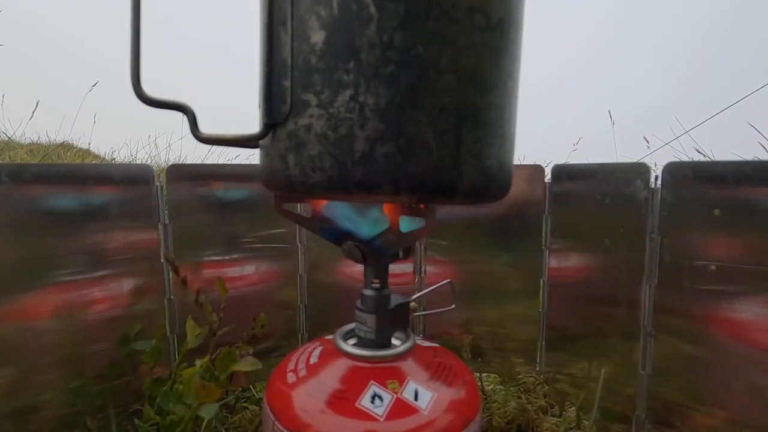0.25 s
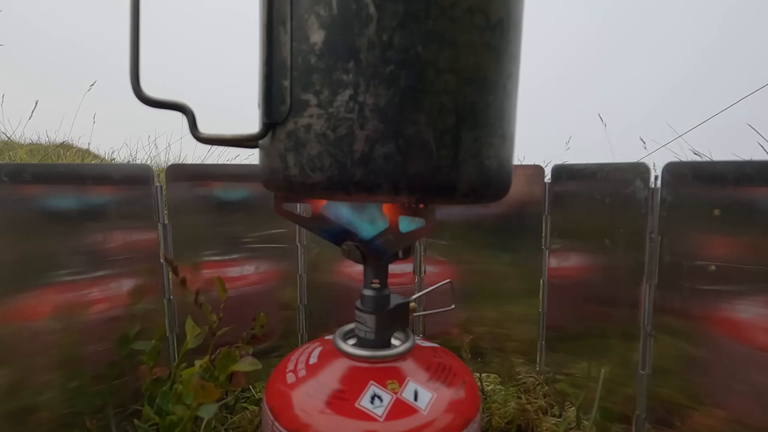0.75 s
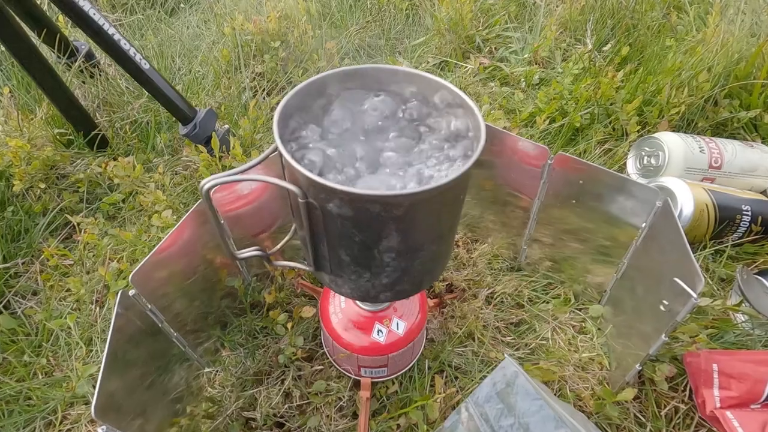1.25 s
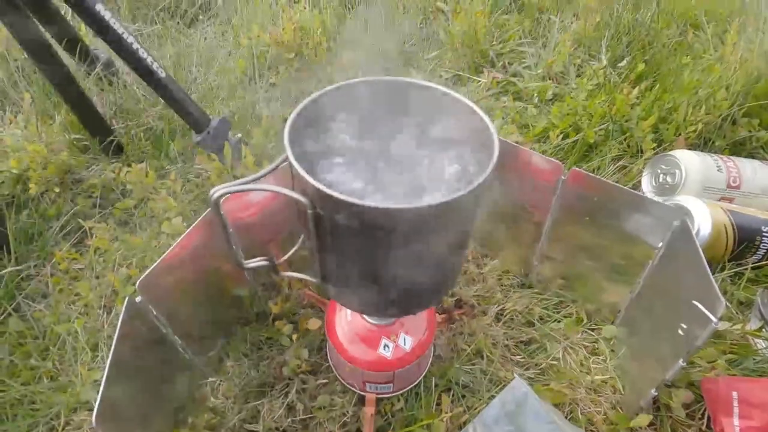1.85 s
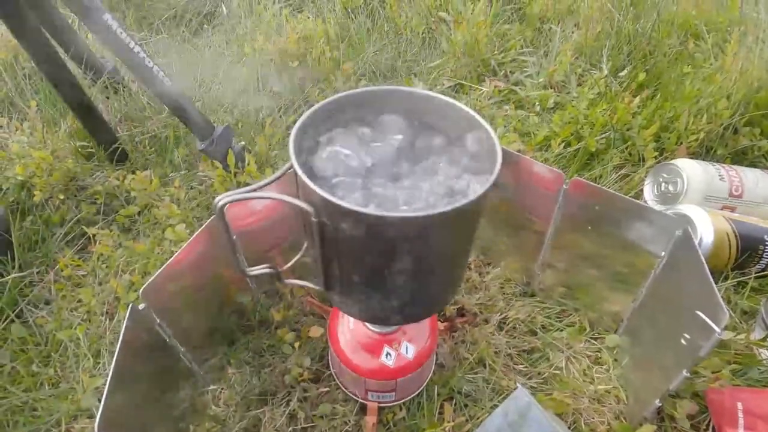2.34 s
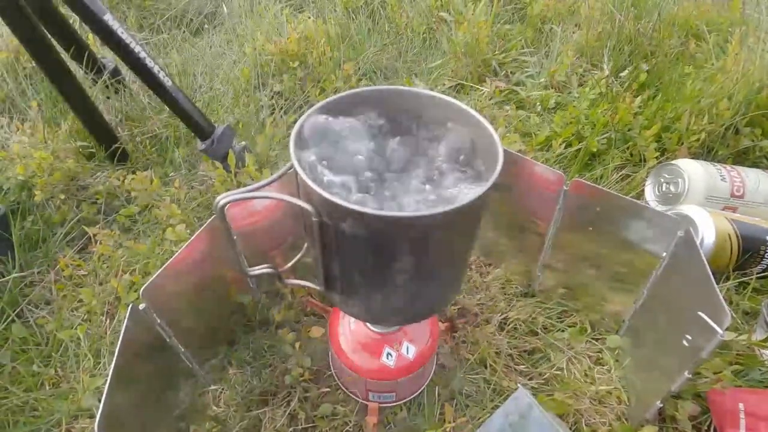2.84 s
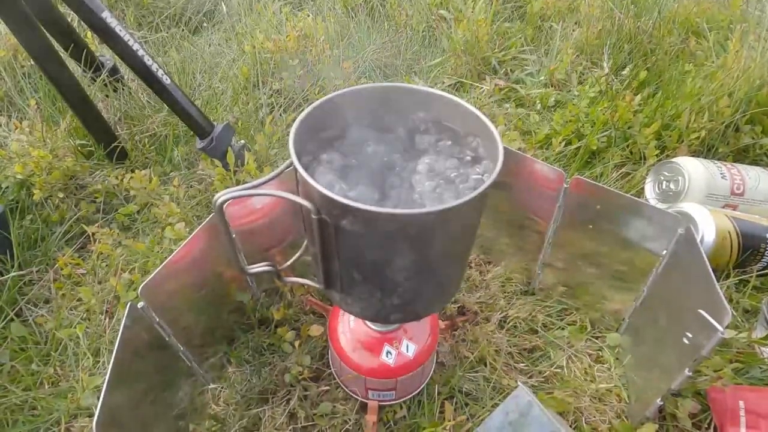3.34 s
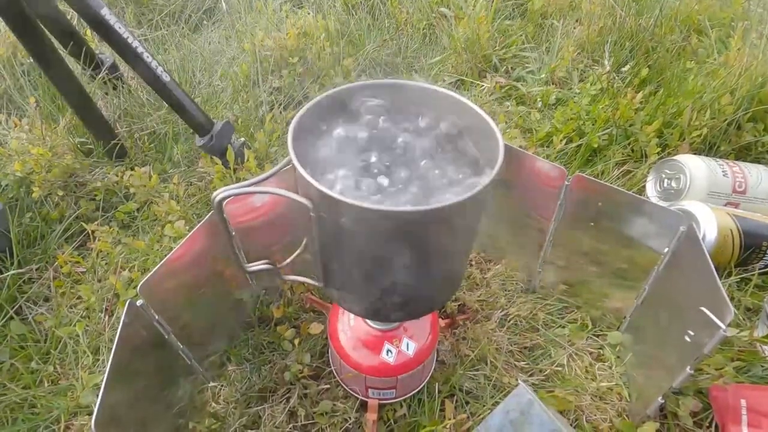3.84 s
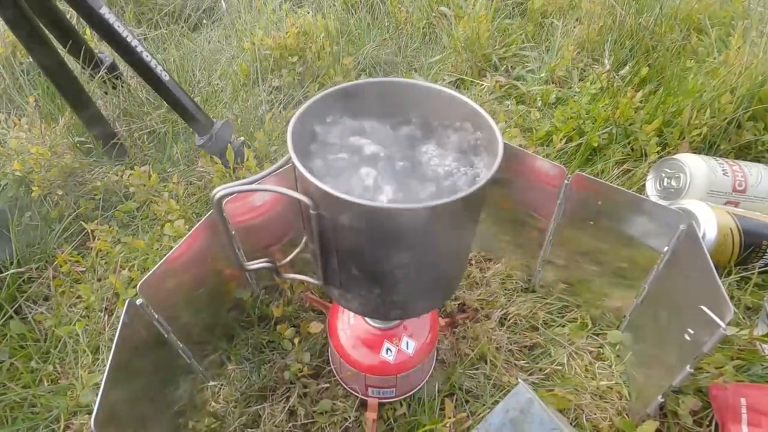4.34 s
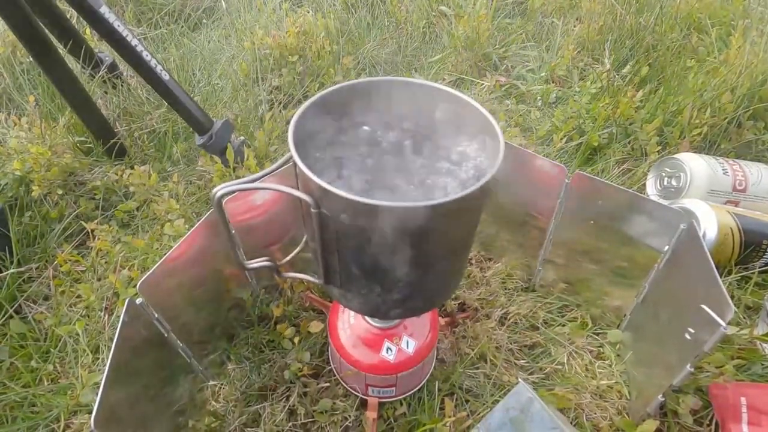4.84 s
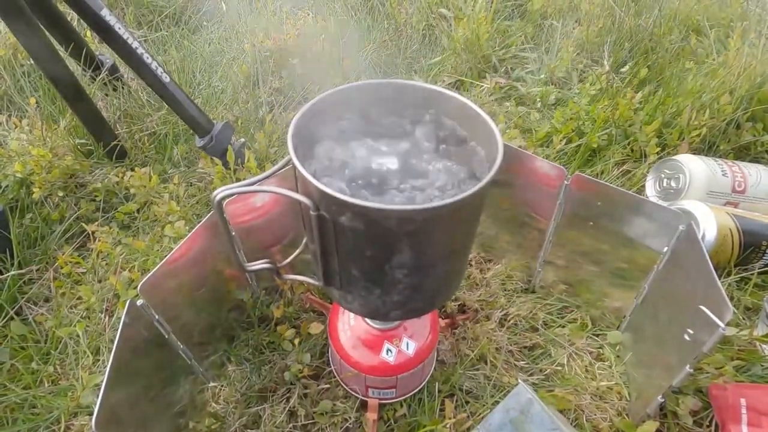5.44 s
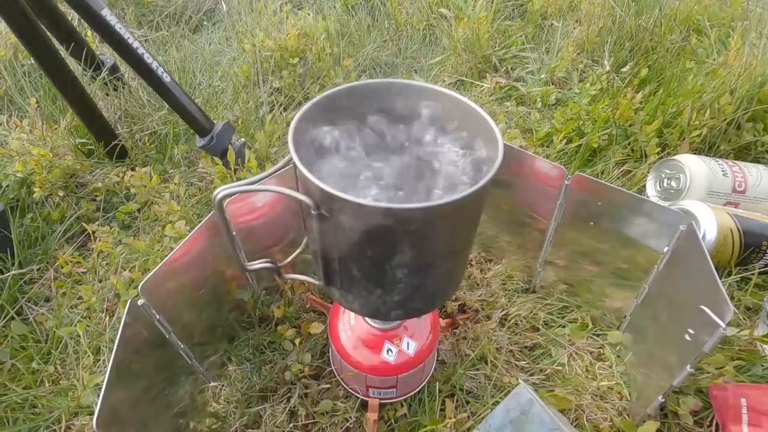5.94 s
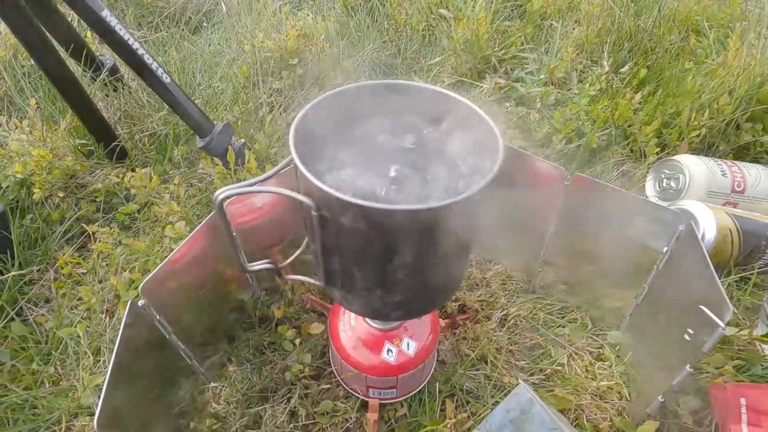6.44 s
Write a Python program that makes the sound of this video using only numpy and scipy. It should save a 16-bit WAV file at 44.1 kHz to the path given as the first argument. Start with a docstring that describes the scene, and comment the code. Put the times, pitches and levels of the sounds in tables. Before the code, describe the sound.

Right beside a small gas stove outdoors, a loud steady roar with low rumble and bright jet hiss. It cuts off abruptly to a short silence. From above the boiling mug the burner then fades in slowly, softer and duller; gusts twice tear the flame away, leaving airy hiss and tiny whistles before it catches again. Faint bubble clicks, low wind, and one sharp pop near the end.

```python
"""In the open, inside a folded metal wind shield, a small gas stove burns under a mug of water.
It is first heard close beside the burner; after a cut and a short silence it fades in from above the boiling mug.
Igniting gas eddies make the rumble, roar and hiss, and turbulent noise makes the jet and the treble above it.
Gusts tear the flame off the burner: its roar drops out and the bare gas jet whistles until it relights.
Bubbles burst as damped clicks, and wind buffets low at both places."""
import sys
import numpy as np
from scipy import signal
from scipy.fft import rfft, irfft, next_fast_len
from scipy.io import wavfile

SR = 44100
rng = np.random.default_rng(int(sys.argv[2]) if len(sys.argv) > 2 else 0)


def undo_db(level):
    """Turn decibels back into plain size, where 20 dB means ten times bigger."""
    steps = np.asarray(level, float) / 20
    return 10 ** steps


def waveform_to_disk(signal):
    """Save audio, clipped to [-1, 1], as 16-bit WAV at the path in sys.argv[1]."""
    frames = np.transpose(np.atleast_2d(signal))
    scaled = np.clip(frames, -1, 1) * 32767
    samples = np.round(scaled).astype(np.int16)
    wavfile.write(sys.argv[1], SR, samples)


N = 294588
T = np.arange(N) / SR
SIZE = next_fast_len(N)
HZ = np.maximum(np.arange(SIZE // 2 + 1) * SR / SIZE, 1.0)
LATE = np.clip((T - 4.85) / 0.15, 0, 1)  # 0 to 1 during the last gust: share of the late spectra

# steady layers beside the burner: rumble, roar, hiss, jet, top [level/dB]
BESIDE_LEVELS = [-22.5, -24.5, -31.7, -28, -50]
# spectra of these layers [f/Hz, level/dB per Hz]
RUMBLE_BESIDE_COLOUR = [(41, -43.5), (70, -8.5), (189, -2), (340, -8.5), (440, -41), (750, -120)]
ROAR_BESIDE_COLOUR = [(200, -24), (340, -0.5), (580, -5.5), (781, -7), (996, -2.5), (1210, -9), (1500, -24),
                      (1950, -50), (3300, -120)]
HISS_BESIDE_COLOUR = [(880, -29), (1500, -4.5), (1550, -20.5), (1670, -4.5), (1870, -0.5), (2290, -2.5),
                      (2870, -9.5), (4070, -9.5), (4420, -7), (5240, -14), (5600, -8.5), (7280, -40.5),
                      (12300, -120)]
JET_BESIDE_COLOUR = [(3290, -34), (5600, -11.5), (6110, -2.5), (6440, -1), (7280, -2.5), (7900, -0.5),
                     (8110, -1), (8710, -14.5), (9060, -6.5), (9430, -5.5), (9600, -19.5), (9860, -20),
                     (10500, -15), (13600, -46), (22000, -120)]
TOP_BESIDE_COLOUR = [(6180, -30), (10500, -8.5), (10900, -4.5), (11800, 0.5), (13900, -9), (15100, -12.5),
                     (15500, -24)]
# stereo balance beside the burner [f/Hz, left against right level/dB]
BESIDE_LEAN = [(60, 0), (110, -1), (200, 1), (380, -1.5), (700, -2), (1290, 1.5), (2380, -1), (4400, 1.5),
               (8120, 1.5), (15000, 5.5)]


def beside_burner():
    """Steady combustion noise: every layer keeps its mean level and spectrum."""
    colours = (RUMBLE_BESIDE_COLOUR, ROAR_BESIDE_COLOUR, [HISS_BESIDE_COLOUR],
               [JET_BESIDE_COLOUR], TOP_BESIDE_COLOUR)
    return stove(BESIDE_LEVELS, colours, BESIDE_LEAN, (0, 0, 0, 0), flutter_db=1.1)


# spectra above the mug [f/Hz, level/dB per Hz]
RUMBLE_ABOVE_COLOUR = [(41, -43.5), (70, -12.5), (108, -4.5), (172, 3.5), (236, 1), (300, -1.5), (340, -8),
                       (440, -59), (750, -120)]
ROAR_ABOVE_COLOUR = [(200, -17), (340, -4), (383, -5), (629, -1), (1010, -1), (1150, -5.5), (1450, -20),
                     (1500, -36), (1950, -57), (3300, -120)]
HISS_ABOVE_COLOUR = [(880, -38), (1500, -6.5), (1690, 4), (1930, -4.5), (2190, -4.5), (2380, -8),
                     (2560, -6), (2940, -9), (3660, -1), (4800, -10.5), (5600, -10), (7280, -43),
                     (12300, -120)]
JET_ABOVE_COLOUR = [(3290, -40), (5600, -4.5), (5790, -9), (6080, 0), (6390, 3), (7840, -12.5), (9010, -6),
                    (10500, -21.5), (13600, -51), (22000, -120)]
TOP_ABOVE_COLOUR = [(6180, -33.5), (10500, -1.5), (10900, -3.5), (13100, -3), (14600, -15.5), (14900, -16),
                    (15500, -28)]
# hiss and jet late above the mug, crossfaded in during the last gust [f/Hz, level/dB per Hz]
HISS_LATE_COLOUR = [(880, -22), (1500, -4), (1720, 2.5), (2270, -6.5), (2410, -7.5), (2590, -6.5),
                    (2810, -9.5), (3700, -2), (4620, -8.5), (5420, -12.5), (5600, -4), (7280, -42),
                    (12300, -120)]
JET_LATE_COLOUR = [(3290, -39), (5600, -20), (6000, 1.5), (6270, 2.5), (7190, -9.5), (7600, -4),
                   (8270, -11), (9750, -7.5), (10500, -22.5), (13600, -48), (22000, -120)]
# stereo balance above the mug [f/Hz, left against right level/dB]
ABOVE_LEAN = [(60, -0.5), (110, 0.0), (200, 0.2), (380, -1.2), (700, -1), (1290, -1.55), (2380, -2.4),
              (4400, 0.11), (8120, 0.0), (15000, 0.14)]


def above_mug():
    """Combustion noise modulated by flame lift-off; hiss and jet crossfade to their late spectra."""
    colours = (RUMBLE_ABOVE_COLOUR, ROAR_ABOVE_COLOUR, [HISS_ABOVE_COLOUR, HISS_LATE_COLOUR],
               [JET_ABOVE_COLOUR, JET_LATE_COLOUR], TOP_ABOVE_COLOUR)
    return stove(flame_levels(), colours, ABOVE_LEAN, side_levels(), flutter_db=0.76)


def stove(levels, colours, lean, sides, flutter_db):
    """Turbulent combustion: igniting eddies flutter together, while hiss and jet flicker in patches."""
    rumble_db, roar_db, hiss_db, jet_db, top_db = levels
    rumble_colour, roar_colour, hiss_colours, jet_colours, top_colour = colours
    low_side_db, hiss_side_db, jet_side_db, top_side_db = sides

    flutter = drift(rate_hz=13.7)  # shared by rumble, roar and hiss
    rumble_db = rumble_db + flutter_db * (flutter + 1.34 * drift(rate_hz=9.0))
    rumble_eddies = eddies(per_s=1500.0, spread_db=2.5)
    out = undo_db(rumble_db) * coloured(rumble_eddies, rumble_colour, lean, low_side_db)

    roar_db = roar_db + flutter_db * (0.84 * flutter + 0.5 * drift(rate_hz=17.0))
    roar_eddies = eddies(per_s=5000.0, spread_db=1.5)
    out += undo_db(roar_db) * coloured(roar_eddies, roar_colour, lean, low_side_db)

    hiss_db = hiss_db + 0.51 * flutter_db * flutter
    fizz = patchy(eddies(per_s=12000.0, spread_db=2.2), 1500, 5600, patchy_db=1.3)
    jet = patchy(rng.standard_normal(N), 5600, 10500, patchy_db=3.0)
    # equal-power crossfade to the late spectra, where there are any
    for share, hiss_colour, jet_colour in zip((1 - LATE, LATE), hiss_colours, jet_colours):
        out += np.sqrt(share) * undo_db(hiss_db) * coloured(fizz, hiss_colour, lean, hiss_side_db)
        out += np.sqrt(share) * undo_db(jet_db) * coloured(jet, jet_colour, lean, jet_side_db)

    air = patchy(rng.standard_normal(N), 10500, 15700, patchy_db=3.0)
    return out + undo_db(top_db) * coloured(air, top_colour, lean, top_side_db)


def eddies(per_s, spread_db):
    """Random impulse process: pockets of gas ignite at random, a few much stronger than the rest."""
    strengths = undo_db(spread_db * np.minimum(rng.exponential(1, N), 4))
    signs = rng.choice([-1, 1], N)
    ignites = rng.random(N) < per_s / SR
    return rms_one(strengths * signs * ignites)


def patchy(drive, low_hz, high_hz, patchy_db, count=14):
    """Independent subband modulation: narrow bands of one range swell and sink each on its own."""
    spectrum = rfft(drive, SIZE)
    band = np.floor((HZ - low_hz) / (high_hz - low_hz) * count)
    out = np.zeros(N)
    for k in range(count):
        swell = undo_db(patchy_db * drift(rate_hz=6.5))
        out += swell * irfft(spectrum * (band == k), SIZE)[:N]
    return out


# layers above the mug: rumble, roar, hiss, jet, top
# [level at full/dB, dB per dB of fade, share of a lift, share of a gust, late gain level/dB]
FLAME_LAYERS = [(-26.5, 1.03, 1.0, -0.042, -1), (-28, 1.0, 0.96, 0.57, 0), (-39.5, 1.05, 0.89, 0.94, 2.1),
                (-45, 1.02, 0.57, 0.92, 4.5), (-61.5, 1.45, -.05, -1.0, 1.5)]
# the flame lifts off the burner; each layer takes its share of the loss
# [t/s, length before relighting/s, rumble loss level/dB, roar loss level/dB, hiss loss level/dB]
FLAME_LIFTS = [(1.598, .08, 1, 5.5, 1), (1.69, .1, 0, 4.5, -2), (1.79, 0.14, 3.5, 9, 4),
               (2.909, 0.013, 8, 9, 5), (2.968, .015, 5, 14, 9), (2.993, 0.036, 6, 7, 8),
               (3.026, .195, 8, 17.5, 9), (3.152, .04, 17, 17, 6), (3.247, 0.037, 3.5, 6.5, 3),
               (4.535, 0.032, 6, 12.5, 9), (4.597, 0.015, 7, 10, 3), (4.71, 0.062, 11, 9.5, 7),
               (4.742, 0.13, 13.5, 25, 9), (4.831, 0.086, 9, 20, 7), (4.982, 0.04, 13, 18, 11),
               (5.053, 0.12, 0.5, 5.5, 9.5), (5.151, 0.042, 6, 7.5, 7.5)]


def flame_levels():
    """Lift-off and reattachment: each layer follows the fade and its shares of the lifts and gusts."""
    lift_s, relight_db_per_s = 0.017, 398
    ragged = 0.077  # spread of the roar loss, relative: a lifted flame stays off unevenly
    shapes = [held(s, length_s, lift_s, roar_db / relight_db_per_s)
              for s, length_s, _, roar_db, _ in FLAME_LIFTS]

    def lift_loss(column):
        return np.max([row[column] * shape for row, shape in zip(FLAME_LIFTS, shapes)], axis=0)

    rumble_loss, roar_loss, hiss_loss = lift_loss(2), lift_loss(3), lift_loss(4)
    roar_loss = roar_loss * (1 + ragged * drift(rate_hz=35.0))
    lifts = rumble_loss, roar_loss, hiss_loss, hiss_loss, hiss_loss

    _, _, hiss_db, jet_db, _ = np.transpose(FLAME_GUSTS)
    slow = gusting(hiss_db, fall_s=0.21)
    jet_gust = gusting(jet_db, fall_s=0.21)
    top_gust = gusting(hiss_db, fall_s=0.04)  # the top rises in a gust, by its negative share
    gusts = slow, slow, slow, jet_gust, top_gust

    fade_db = fade_above()
    levels = []
    for layer, lift, gust in zip(FLAME_LAYERS, lifts, gusts):
        db, follow, lift_share, gust_share, late_db = layer
        losses = lift_share * lift + gust_share * gust
        levels.append(db + follow * fade_db - losses + late_db * LATE)
    return levels


# the place above the mug fades in [t/s, roar level before its modulations/dB]
ABOVE_FADE = [(1.29, -87), (1.33, -66.5), (1.48, -47.5), (1.56, -44.5), (2.05, -44), (2.5, -41.5),
              (2.9, -37.5), (3.4, -34), (3.7, -32), (4.0, -31), (4.6, -29.5), (5.4, -28), (5.7, -29),
              (6.05, -27.5), (6.35, -28), (6.68, -28)]


def fade_above():
    """Gain envelope: the fade above the mug in dB against full level."""
    full_db = -28
    return in_time(ABOVE_FADE) - full_db


# gusts hold the flame down and bare the jet; each layer takes its share of the losses
# [t/s, length/s, hiss loss level/dB, jet loss level/dB, bare hiss level at full fade/dB]
FLAME_GUSTS = [(1.57, .3, 6.5, 9, -51), (2.902, 0.3, 6.5, 11, -47), (4.483, 0.28, 2.5, 5, -51.5),
               (4.71, 0.49, 10.5, 13, -48)]


def gusting(values, fall_s):
    """Envelope maximum: the largest value among the gusts blowing at each moment."""
    rise_s = 0.025
    blows = [value * held(s, length_s, rise_s, fall_s)
             for (s, length_s, *_), value in zip(FLAME_GUSTS, values)]
    return np.max(blows, axis=0)


# side level rises toward the end: rumble and roar, hiss, jet [level/dB per s squared, lowest level/dB]
SIDE_RISE = [(2.5, -48), (1.3, -11), (0.2, -7)]


def side_levels():
    """Side-signal attenuation: level in dB against full side, for the low, hiss, jet and top layers."""
    to_end_s = T[-1] - T
    low, hiss, jet = [np.maximum(-rate * to_end_s ** 2, least_db) for rate, least_db in SIDE_RISE]
    dip_db = 20 * held(2.35, 1.5, 0.05, 0.033)  # the side of hiss and jet is lowered by 20 dB
    top = -4 * np.clip((T - 3.4) / 0.1, 0, 1)  # the side of the top is 4 dB lower from here on
    return low, hiss - dip_db, jet - dip_db, top


# spectrum of the unburnt gas [f/Hz, level/dB per Hz]
BARE_JET_COLOUR = [(240, -51.5), (400, -15), (533, -1), (628, -19.5), (673, -6), (750, -9), (872, -2),
                   (1190, -6.5), (10500, -11), (13600, -45), (22000, -120)]
# two sliding burner resonances [f/Hz, wander f/Hz, level against bare hiss/dB, flicker level/dB, width f/Hz]
SLIDING_RESONANCES = [(7100, 150, -11, 1, 330), (9250, 340, -9, 4.5, 890)]


def bare_jet():
    """Turbulent jet noise: unburnt gas hisses in a gust, and two burner resonances slide about."""
    flicker = undo_db(1.5 * drift(rate_hz=16.0))
    jet_side_db = side_levels()[2]
    out = flicker * coloured(rng.standard_normal(N), BARE_JET_COLOUR, ABOVE_LEAN, jet_side_db)
    for hz, wander_hz, db, flicker_db, width_hz in SLIDING_RESONANCES:
        gain = undo_db(db + flicker_db * drift(rate_hz=16.0))
        out = out + gain * gliding(hz + wander_hz * drift(rate_hz=7.6), width_hz)
    bare_gains = undo_db(np.transpose(FLAME_GUSTS)[-1])
    return out * gusting(bare_gains, fall_s=0.21) * undo_db(fade_above())


def gliding(hz, width_hz):
    """Quadrature modulation: a band of noise is carried on a moving centre pitch."""
    lowpass = signal.butter(2, width_hz / 2, fs=SR, output="sos")
    slow = signal.sosfilt(lowpass, rng.standard_normal((2, N)))
    phase = 2 * np.pi * np.cumsum(hz) / SR
    return rms_one(slow[0] * np.cos(phase) + slow[1] * np.sin(phase))


# nozzle and burner resonances whistle in spurts as the flame lifts and relights
# [t/s, nominal peak level/dB, f/Hz, length/s, width of each resonator f/Hz]
WHISTLE_SPURTS = [(3.029, -46, 11700, 0.035, 1900), (3.114, -42, 12100, 0.045, 1900),
                  (3.152, -41, 12100, 0.056, 1900), (3.21, -44.5, 12000, 0.035, 1900),
                  (4.5361, -46, 11700, 0.035, 1900), (4.71, -39, 12200, 0.047, 1900),
                  (4.75, -38, 12400, 0.035, 1900), (4.795, -31, 11800, 0.053, 1900),
                  (4.888, -33, 12900, 0.028, 1900), (4.99, -31.5, 11860, 0.039, 1900),
                  (5.032, -35, 11400, 0.035, 1900), (5.108, -43, 12200, 0.04, 1900),
                  (5.167, -44.5, 12100, 0.035, 1900), (4.7994, -40, 5570, 0.097, 500),
                  (5.0694, -44, 5400, 0.12, 500), (3.157, -47, 7100, .13, 500),
                  (4.595, -40, 7200, .11, 500), (4.93, -36, 10200, 0.063, 800),
                  (5.091, -34.5, 9900, 0.062, 800), (5.218, -38, 9670, .14, 800),
                  (3.2939, -58, 3860, 0.09, 700), (3.4094, -39, 3670, 0.078, 700),
                  (3.494, -33.5, 3870, 0.082, 700), (5.2994, -45, 3910, 0.09, 700)]


def whistles():
    """Resonance driven by noise: each spurt is a broad nozzle band with a narrow core, swelling and fading."""
    out = np.zeros((2, N))
    air = rng.standard_normal((2, N))
    air[1] = 0.9 * air[0] + 0.45 * air[1]  # the channels are largely alike
    for s, db, hz, length_s, width_hz in WHISTLE_SPURTS:
        at = round(s * SR)
        size = round(np.clip(length_s, 0.01, 0.2) * SR)
        broad = resonance(resonance(air[:, at:at + size], hz, width_hz), hz, width_hz)
        core = resonance(broad, hz, width_hz=300.0)
        spurt = rms_one(rms_one(broad) + 0.5 * rms_one(core))
        # the rms before the window lies 13.5 dB under the nominal peak
        out[:, at:at + size] += undo_db(db - 13.5) * spurt * signal.windows.tukey(size, 0.5)
    return out


def resonance(x, hz, width_hz):
    """Two-pole resonator: a band with gain 1 on top."""
    r = np.exp(-np.pi * width_hz / SR)
    zeros = np.array([1, 0, -1]) * (1 - r * r) / 2
    poles = [1, -2 * r * np.cos(2 * np.pi * hz / SR), r * r]
    return signal.lfilter(zeros, poles, x)


# bubbles that burst loudly at the surface [t/s, nominal peak level/dB, f/Hz]
BUBBLE_POPS = [(1.6856, -45, 2600), (2.946, -34, 2840), (2.9786, -37, 2980), (3.051, -43, 2570),
               (3.235, -36, 2530), (3.347, -38, 3770), (4.599, -32, 3950), (4.872, -32, 3640),
               (6.0725, -13, 6200)]


def pops():
    """Damped oscillation: a bursting bubble clicks for about a cycle over a short knock of the mug."""
    out = np.zeros(N)
    t = np.arange(600) / SR
    knock = 0.053 * np.sin(2 * np.pi * 930 * t) * np.exp(-t / 0.0018)
    for s, db, hz in BUBBLE_POPS:
        swell = np.minimum(t * hz, 1)  # over the first cycle
        click = np.sin(2 * np.pi * hz * t) * np.exp(-t * hz) * swell
        out[round(s * SR):][:len(t)] += undo_db(db + 7.5) * (click + knock)  # makes up for the damping
    return signal.sosfilt(signal.butter(4, 8500, fs=SR, output="sos"), out)


# wind beside the burner, then above the mug [t/s, level before lumps/dB]
WIND_LEVELS = [
    [(0.0, -29), (0.36, -43), (0.75, -46), (1.06, -37), (1.2, -42)],
    [(1.3, -75.5), (1.52, -62.5), (2.2, -63), (2.95, -43.5), (3.9, -44), (4.7, -38), (4.96, -33),
     (5.4, -44.5), (6.3, -40), (6.68, -46)],
]
# spectrum of the wind [f/Hz, level/dB per Hz]
WIND_SPECTRUM = [(11, -35), (18, -7.5), (90, 2), (120, -35), (200, -120)]


def wind(cut):
    """Low-frequency turbulence: noise buffets in slow lumps at both places."""
    beside, above = [undo_db(in_time(rows)) for rows in WIND_LEVELS]
    lumps = undo_db(4 * drift(rate_hz=5.0))
    rumble = coloured(rng.standard_normal(N), WIND_SPECTRUM, ABOVE_LEAN)
    return (cut * beside + above) * lumps * rumble


# full side level of the stereo image [f/Hz, side against mid level/dB]
IMAGE_WIDTH = [(60, -58), (110, -33), (200, -36), (380, -17.5), (700, -42.5), (1290, -24), (2380, -12.5),
               (4400, -10), (8120, -15.5), (15000, -1.5)]


def coloured(drive, colour, lean, side_db=0):
    """Spectral shaping and mid/side stereo: lean and reflections off the shield, as separate noise, make the side."""
    mid = rfft(drive, SIZE) * undo_db(at_hz(colour))
    reflections = rfft(rng.standard_normal(N), SIZE) * undo_db(at_hz(colour) + at_hz(IMAGE_WIDTH))
    side = mid * np.tanh(at_hz(lean) * np.log(10) / 40) + reflections  # tanh turns left/right dB into side/mid
    unit_power = SIZE / np.sqrt(2 * np.sum(abs(mid) ** 2))
    mid, side = irfft([mid, side], SIZE)[:, :N] * unit_power
    return mid + undo_db(side_db) * side * [[1], [-1]]


def drift(rate_hz):
    """Low-passed random process of spread 1: coarse noise through a double one-pole."""
    r = np.exp(-40 * np.pi * rate_hz / SR)  # one coarse step is 20 samples
    coarse = rng.standard_normal(N // 20 + 2002)
    slow = signal.lfilter([1], [1, -2 * r, r * r], coarse)[2000:]
    return np.interp(np.arange(N) / 20, np.arange(len(slow)), rms_one(slow))


def held(s, length_s, rise_s, fall_s):
    """Trapezoidal envelope: 0 to 1 over the rise, held to the end of the length, then back over the fall."""
    rise = (T - s) / rise_s
    fall = 1 + (s + length_s - T) / fall_s
    return np.clip(np.minimum(rise, fall), 0, 1)


def in_time(rows):
    """Linear interpolation of levels in dB over time, silent before the first row."""
    s, db = np.transpose(rows)
    return np.interp(T, s, db, left=-120)


def at_hz(points):
    """Logarithmic frequency scale: a table is read between its points on a log axis."""
    hz, value = np.transpose(points)
    return np.interp(np.log(HZ), np.log(hz), value)


def rms_one(x):
    """Power normalization: scale to unit mean square."""
    return x / np.sqrt(np.mean(x ** 2) + 1e-20)


def scene():
    """Superposition of the sources at two listening places, the first ended by a hard cut."""
    cut_s, cut_fall_s = 1.2058, 0.001
    cut = np.clip((cut_s - T) / cut_fall_s, 0, 1)
    return cut * beside_burner() + above_mug() + bare_jet() + whistles() + pops() + wind(cut)


def low_pass(x):
    """Removes everything above the highest recorded frequency."""
    return signal.sosfilt(signal.butter(12, 15640, fs=SR, output="sos"), x)


def record(dry):
    """Linear pick-up: the finished mix passes on with no added gain."""
    return low_pass(dry)


dry = scene()
out = record(dry)
waveform_to_disk(out)
```